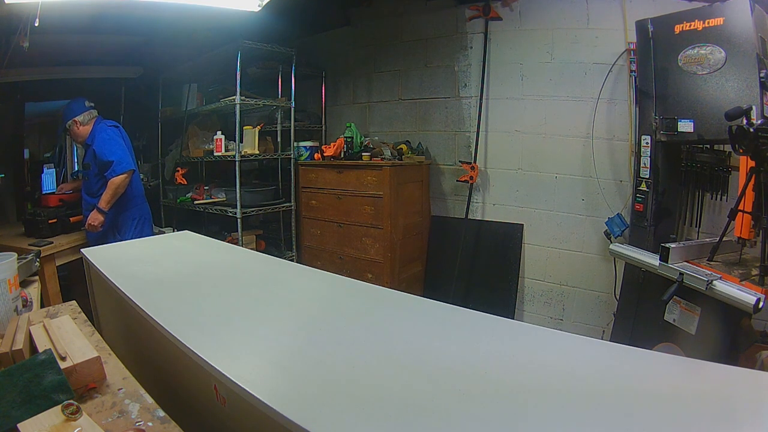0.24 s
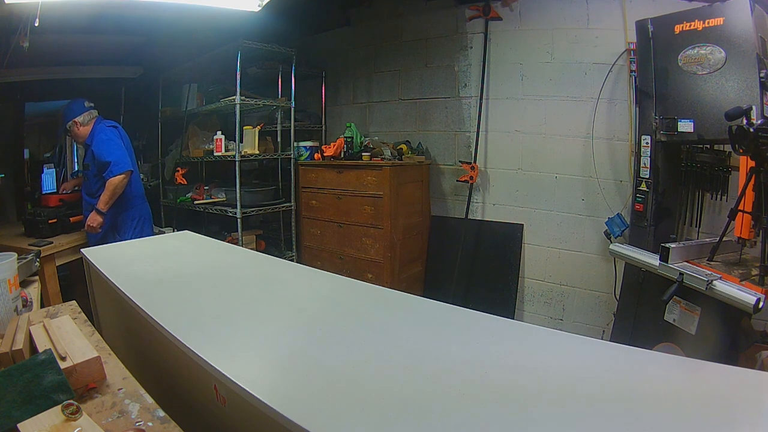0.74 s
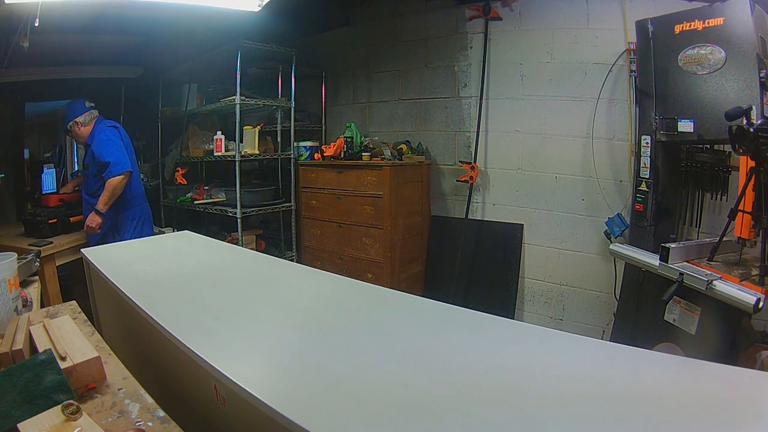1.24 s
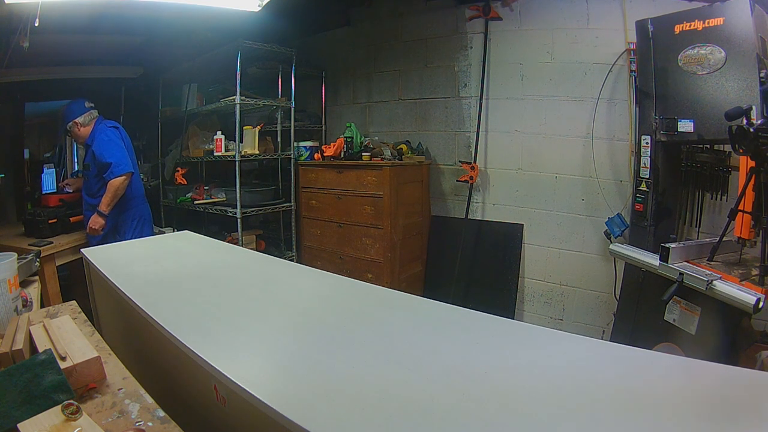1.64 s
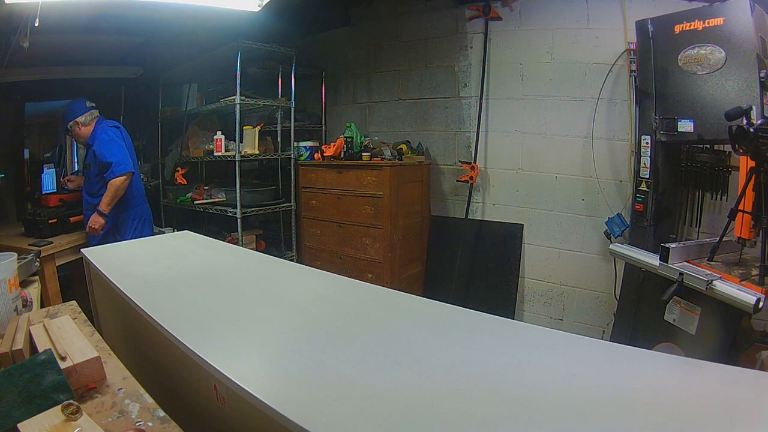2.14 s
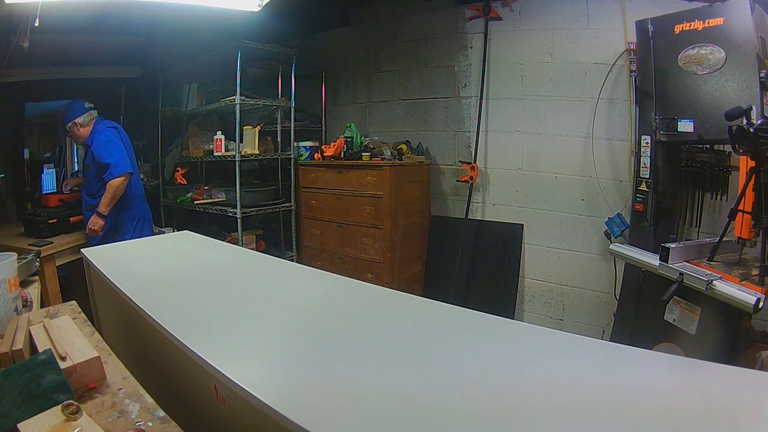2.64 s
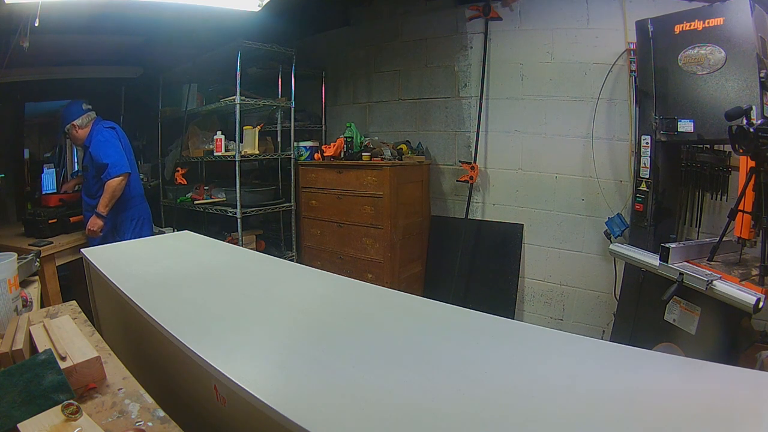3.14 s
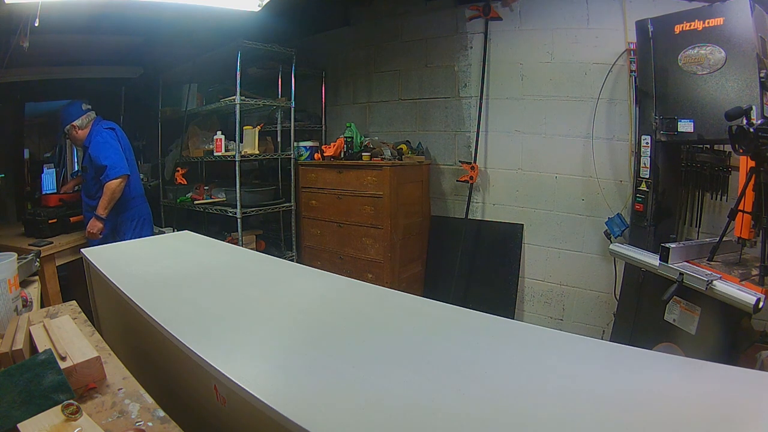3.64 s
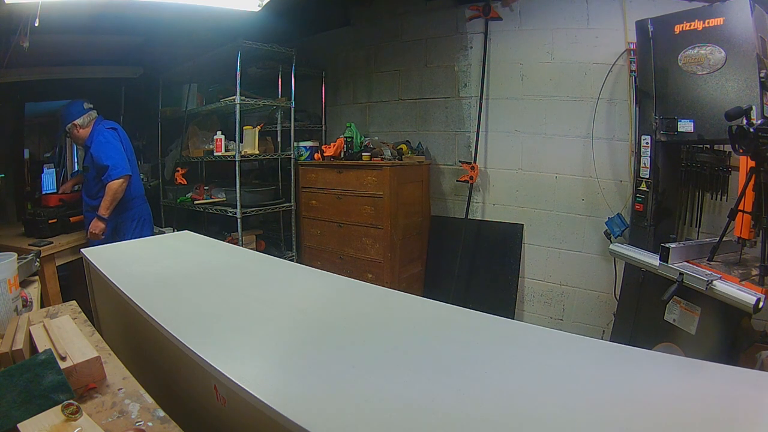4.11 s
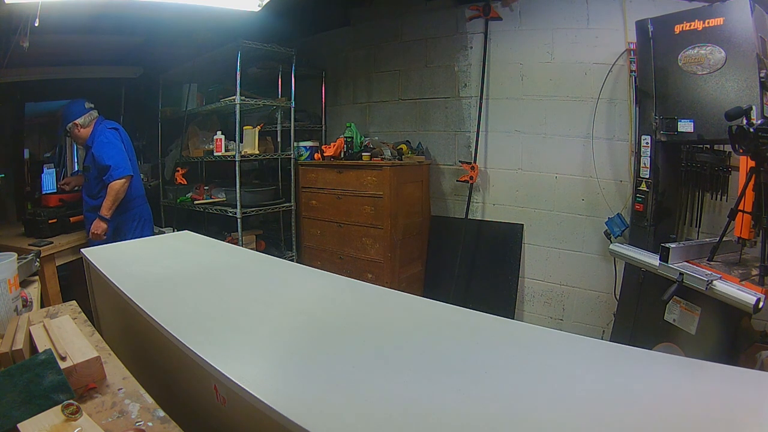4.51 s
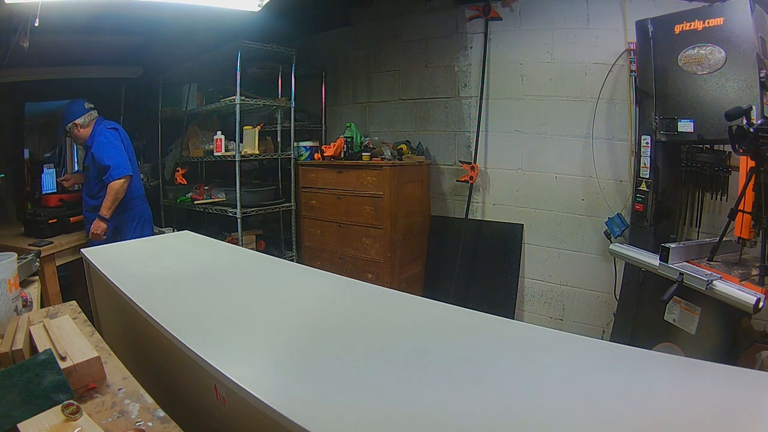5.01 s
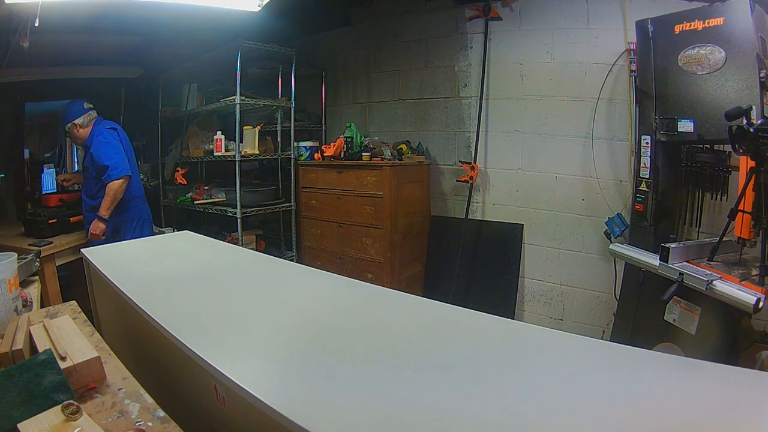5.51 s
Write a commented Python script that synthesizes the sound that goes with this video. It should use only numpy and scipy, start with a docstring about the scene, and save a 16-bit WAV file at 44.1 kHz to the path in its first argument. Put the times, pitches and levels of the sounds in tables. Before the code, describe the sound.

A quiet workshop with hard block walls, heard from several metres away; faint hiss and low building rumble run throughout. From 0 to 0.4 s, barely audible scrapes and a tiny tick. At 0.8 s a steel tool lands in a case with a loud, bright clank around 4 kHz and higher, ringing and chattering through 1.1 s, with a boxy knock and rapid weakening rebounds. Light taps and soft sliding follow from 1.2 to 1.8 s. Near stillness until a faint clink at 2.6 s, then a clear ringing spanner rattle at 2.85 to 3 s. Small pieces drag from 3.2 s, growing to rougher scraping and knocks at 3.7 and 4.07 s. At 4.35 to 4.5 s comes a sharp, high cluster of clinks and a short rattle, then a faint drag near 5 s and quiet room tone. Short diffuse echoes and soft deep bench swells follow the heavier blows.

```python
"""Rummaging in a tool case

At the far side of a block-walled workshop, steel tools and loose hardware chatter and ring, knock on the
case and slide over its floor. Random impacts drive damped modes or are coloured into cracks and scrapes.
The microphone is several metres off, so most of the sound arrives by the walls, as random decaying echoes.
Filtered noise makes the low rumble, the hiss and the bench's deep swell after each landing."""
import sys
import numpy as np
from scipy import signal
from scipy.fft import rfft, irfft
from scipy.io import wavfile

SR = 44100
rng = np.random.default_rng(int(sys.argv[2]) if len(sys.argv) > 2 else 0)


def transcribe(signal):
    """Save signal, clipped to [-1, 1], as a 16-bit WAV file at the path in sys.argv[1]."""
    frames = np.atleast_2d(signal).T
    limited = np.clip(frames, -1, 1)
    pcm = np.round(limited * 32767).astype(np.int16)
    wavfile.write(sys.argv[1], SR, pcm)


N = 254016
TAIL = 20480  # samples given to each impact and to the shop's response
AGE = np.arange(TAIL) / SR  # seconds since an impact

# Colour of the building's rumble and the bench's boom. Each row: frequency in Hz, relative dB per Hz.
RUMBLE_COLOUR = [(12, -23), (22, 3.5), (50, -6), (62, 2.5), (75, -10), (115, -13), (200, -22.5),
                 (1000, -90)]
# Colour of the crack of a contact. Each row: frequency in Hz, relative level in dB.
CRACK_COLOUR = [(100, -16.5), (250, -3.5), (480, -6.5), (700, -1), (1300, -2.5), (1900, -2.5), (3000, -3),
                (4500, -3), (6000, -6), (9000, -7.5), (11500, -15), (13000, -27), (15500, -41)]
# A tool lands in the case and settles. Each row: start in seconds, level in dB, brightness in dB per octave,
# chatter in seconds, thud of the shell in dB, level of the rebounds in dB, settling time in seconds.
LANDINGS = [ (.814, -36.5, -1.5, 0.018, -64, -44, 0.44), (0.897, -40, 13, 0.006, -60, -55, .02),
            (1.062, -36.5, .5, 0.0042, -45.5, -50.5, 0.12), (1.309, -55, -0.5, 0.0076, -87, -65, .02),
            (1.461, -49, -1, 0.006, -82, -58, 0.053), (1.571, -50.5, 2, 0.017, -64, -54, 0.055),
            (2.606, -58.5, -0.5, 0.007, -82, -63, .06), (2.845, -40, 9.5, .025, -50.5, -46.5, 0.28),
            (2.937, -39.5, 11.5, 0.0086, -61, -55, .02), (3.124, -51.5, .5, 0.02, -62.5, -62, 0.024),
            (3.728, -44.5, 3, 0.018, -57.5, -47, 0.069), (3.946, -55.5, -0.5, 0.023, -62.5, -65, .02),
            (4.068, -41.5, 4, 0.026, -54, -47, 0.13), (4.386, -39, 1.5, 0.026, -50, -38.5, 0.11), ]
# Modes of each loose piece, by name. Each row: frequency in Hz, relative level in dB, t60 in seconds.
PIECE_MODES = { "wrench": [(4330, 0, .2), (4443, -1.5, .2), (4385, -9, .07), (11083, -3, .26),
               (11312, 0, .28), (11255, -11, .1)], "spanner": [(4243, -1, .36), (4315, -3, .3),
               (4365, -3, .24), (4445, -5, .36), (8960, -22, .2), (10990, -6, .22), (11019, -5, .22),
               (11117, -1, .32), (11318, -12, .2)], "bit": [(3600, -16, .05), (4130, -11, .03),
               (8083, -10, .1), (8126, -4, .12), (8209, 0, .15), (8280, -9, .09), (9975, -17, .12),
               (11320, -29, .08), (14390, -33, .12)], "socket": [(3578, 0, .1), (3680, -7, .05),
               (4090, -5, .03), (4861, -9, .07), (8149, -4, .08), (9985, -15, .08), (14392, -16, .07)],
               "screw": [(4350, -6, .012), (4800, -8, .012), (6420, -4, .06), (8205, 0, .07),
               (11320, -1, .06), (14300, -14, .04)], "pin": [(4290, -11, .16), (6440, 0, .07)],
               "pliers": [(3364, 0.5, 0.015), (3740, 8.5, 0.01), (4310, 17.5, 0.0064), (4694, -4, 0.017),
               (5320, 2.5, 0.014), (5850, -16, 0.013)], "lid": [(678, 6.5, 0.011), (793, -4.5, 0.059),
               (1107, 9, 0.018), (1333, 9, 0.024), (1680, 5.5, 0.0062)], "washer": [(3240, -4, 0.022),
               (3360, -1, 0.0093), (4750, -2, 0.035)], "handle": [(368, -1.5, 0.013), (860, 5, 0.016),
               (1060, -13, .012)], }


def undb(db):
    """Decibels to gain."""
    return 10 ** (np.asarray(db) / 20)


def level(x, db):
    """Scale a short sound to the energy of a twentieth of a second at this level."""
    energy_s = np.sum(x ** 2) / SR
    return x * undb(db) / np.sqrt(energy_s * 20)


def colour(x, points, tilt_db=0):
    """Shape a spectrum by (Hz, dB) points and a slope in dB per octave."""
    octave = np.log2(np.maximum(np.fft.rfftfreq(len(x), 1 / SR), 10))
    hz, db = np.transpose(points)
    gain = undb(np.interp(octave, np.log2(hz), db) + tilt_db * octave)
    return irfft(rfft(x) * gain, len(x))


def add(out, s, x):
    """Mix a sound in at a time in seconds."""
    start = max(int(s * SR), 0)
    out[start:start + len(x)] += x[:N - start]


def room_paths(direct_db=-10, build_s=0.00017, sparse_s=.025):
    """Response of the shop from one spot: a weak direct path, distinct early echoes, then a dense tail."""
    # Reverberation of the shop. Each row: frequency in Hz, t60 in seconds.
    reverb_times = [(150, 0.36), (600, 0.42), (2000, 0.26), (5000, 0.25), (12000, 0.25)]
    density = np.minimum(0.11 + (AGE / sparse_s) ** 2, 1)
    present = rng.random(TAIL) < density
    echoes = rng.standard_normal(TAIL) * present / np.sqrt(density)
    spectrum = rfft(echoes)
    octave = np.log2(np.fft.rfftfreq(TAIL, 1 / SR) + 1)
    hz, t60s = np.transpose(reverb_times)
    tail = np.zeros(TAIL)
    # overlapping bands, each dying away at its own pace
    for band, t60 in zip(np.eye(len(hz)), t60s):
        band_echoes = irfft(spectrum * np.interp(octave, np.log2(hz), band))
        tail += band_echoes * np.exp(-np.log(1000) * AGE / t60)
    tail *= 1 - np.exp(-AGE / build_s)
    tail[0] += undb(direct_db) * np.sqrt(np.sum(tail ** 2))
    return np.roll(tail, SR // 2000)  # half a millisecond later


def in_room(x):
    """Impacts as they arrive across the shop; pieces move, so each finds its own pattern of echoes."""
    return signal.fftconvolve(x, room_paths())[:TAIL]


def contacts(force, rate, scatter_db):
    """Tiny impacts at random moments (rate per second), of uneven size, under a force envelope."""
    happens = rng.random(TAIL) < rate / SR
    return force * happens * undb(scatter_db * rng.standard_normal(TAIL))


def blow(chatter_s, rate=450, bounce_db=-3, clean_s=0.023):
    """A first impact and its bounces across the shop; longer chatter means a more glancing first touch."""
    bounce_force = np.exp(-(AGE / chatter_s) ** 2)
    hits = undb(bounce_db) * contacts(bounce_force, rate, scatter_db=5)
    hits[0] = 1 / (1 + (chatter_s / clean_s) ** 2)
    return in_room(hits)


def resonate(x, hz, t60):
    """One damped mode as a two-pole resonator; t60 is its 60 dB decay in seconds."""
    pole = np.exp((2j * np.pi * hz - np.log(1000) / t60) / SR)
    return signal.lfilter([1, 0, -1], [1, -2 * pole.real, abs(pole) ** 2], x)


def ring(push, modes, tilt_db=0, onset_s=0.0054):
    """Impacts drive modes, each with a slightly rounded onset; harder contact favours the high ones."""
    out = np.zeros(TAIL)
    for hz, db, t60 in modes:
        rounded = resonate(push, hz, onset_s)
        out += level(resonate(rounded, hz, t60), db + tilt_db * np.log2(hz))
    return out


def air(hiss_db=-62, rumble_db=-63.5):
    """Steady noise of the still shop: hiss over the building's low rumble, each at its RMS level."""
    # Colour of the hiss. Each row: frequency in Hz, relative dB per Hz.
    hiss_colour = [(71, -7), (120, -3.5), (230, -4.5), (339, -5.5), (415, -8.5), (690, -5.5), (2750, -14),
                   (9910, -17), (14300, -17.5), (15500, -18.5)]
    hiss = colour(rng.standard_normal(N), hiss_colour)
    rumble = colour(rng.standard_normal(N), RUMBLE_COLOUR)
    return undb(hiss_db) * hiss / np.std(hiss) + undb(rumble_db) * rumble / np.std(rumble)


def booms(hardest_boom_db=-51.5, slope=0.53, peak_s=0.085):
    """The bench answers each landing with a slow, deep swell of noise that grows with the blow."""
    out = np.zeros(N)
    swell = AGE * np.exp(-AGE / peak_s)  # tops out at peak_s
    hardest_db = max(db for _, db, *_ in LANDINGS)
    for s, db, *_ in LANDINGS:
        boom = swell * colour(rng.standard_normal(TAIL), RUMBLE_COLOUR)
        # slope: dB lost per dB of a weaker blow
        add(out, s, level(boom, hardest_boom_db + slope * (db - hardest_db)))
    return out


def slides(rate=900):
    """Pieces dragged over the case floor make a swell of small random contacts."""
    # Each row: start in seconds, length in seconds, level in dB.
    drags = [ (0, 0.03, -59.5), (.07, .16, -54), (0.323, 0.056, -59.5), (1.159, 0.15, -56),
             (1.342, 0.28, -52.5), (3.199, 0.49, -54.5), (3.654, 0.28, -47), (4.048, 0.032, -51.5),
             (4.202, 0.36, -48), (4.564, 0.18, -58), (4.886, 0.44, -64.5), ]
    out = np.zeros(N)
    for s, length_s, db in drags:
        force = np.sqrt(np.abs(np.sin(np.pi * np.minimum(AGE / length_s, 1))))
        scrape = in_room(contacts(force, rate, scatter_db=0.5))
        add(out, s, level(colour(scrape, CRACK_COLOUR), db))
    return out


def knock(db, tilt_db, chatter_s, thud_db):
    """One blow on the case: a broad crack and the thud of the shell's damped modes."""
    # Modes of the case shell and the bench under it.
    # Each row: frequency in Hz, relative level in dB, t60 in seconds.
    shell_modes = [(104, -1.5, 0.048), (185.6, 4, 0.19), (306, 3, 0.0085), (598, -0.5, 0.027),
                   (630, -15, 0.071), (910, 1, 0.0094)]
    push = blow(chatter_s)
    crack = level(colour(push, CRACK_COLOUR, tilt_db), db)
    thud = level(ring(push, shell_modes), thud_db)
    return crack + thud


def knocks(count=4, rebound_s=.047, rebound_chatter_s=0.029, rebound_thud_db=-15, settled_db=-9):
    """A tool lands in the case, then rebounds at even intervals, ever more weakly."""
    out = np.zeros(N)
    for s, db, tilt_db, chatter_s, thud_db, rebound_db, settle_s in LANDINGS:
        add(out, s, knock(db, tilt_db, chatter_s, thud_db))
        for after_s in rebound_s * (1 + np.arange(count)):
            # changed by settled_db at the end of the settling time
            now_db = rebound_db + settled_db * (after_s / settle_s) ** 2
            rebound = knock(now_db, 0, rebound_chatter_s, now_db + rebound_thud_db)
            add(out, s + after_s, rebound)
    return out


def rattles(touch_gap_s=.022, fall_db=-7.5):
    """A piece rocks against its neighbours at even intervals; every touch rings its modes again."""
    # Each row: start in seconds, piece, level in dB, brightness in dB per octave, length in seconds,
    # loudest moment as a fraction of the length, chatter of a touch in seconds.
    rocking = [ (0.812, "wrench", -29, -2.5, 0.071, 0.86, 0.01),
               (.965, "wrench", -38.5, 2.5, .044, 0, 0.012), (1.46, "socket", -62.5, 4, 0.093, 0.2, 0.018),
               (2.849, "spanner", -32.5, 1.5, .122, 0.28, 0.011),
               (3.748, "screw", -43.5, -0.5, 0.034, 0.7, 0.0096),
               (4.386, "bit", -29, 5.5, .041, 0.26, 0.0052),
               (4.416, "socket", -36.5, 1.5, .054, 0.38, 0.0062), ]
    out = np.zeros(N)
    for s, piece, db, tilt_db, length_s, loudest, chatter_s in rocking:
        touches = 1 + round(length_s / touch_gap_s)  # the gap is approximate
        for part in np.linspace(0, 1, touches):
            touch = ring(blow(chatter_s), PIECE_MODES[piece], tilt_db)
            # changed by fall_db one whole length away from the loudest moment
            touch_db = db + fall_db * (part - loudest) ** 2
            add(out, s + part * length_s, level(touch, touch_db))
    return out


def clinks():
    """Loose pieces ring when struck; close pairs of steel modes beat."""
    # Each row: start in seconds, piece, level in dB, brightness in dB per octave, chatter in seconds.
    strikes = [ (.11, "screw", -59.5, -8, 0.012), (0.812, "lid", -36.5, 1, 0.0051),
               (.913, "wrench", -27.5, 24, 0.007), (1.010, "socket", -45, 1, 0.0036),
               (1.061, "pliers", -35.5, 23, 0.0066), (1.516, "spanner", -50.5, -3, 0.01),
               (1.523, "bit", -60, 1, 0.013), (1.573, "pliers", -59, 0, 0.0066),
               (2.659, "spanner", -59.5, 8, 0.0061), (2.845, "lid", -46, -5.5, 0.029),
               (3.265, "pin", -56, -2, 0.00075), (3.738, "pliers", -46.5, -14, 0.051),
               (4.064, "pliers", -43, -26, 0.039), (4.071, "bit", -49.5, 1, 0.024),
               (4.295, "handle", -51.5, -1.5, 0.0014), (4.347, "socket", -50, 3.5, 0.0067),
               (4.355, "bit", -35.5, 20, 0.045), (4.386, "pliers", -37, -23, .0015),
               (4.484, "washer", -42.5, -2, 0.0022), ]
    out = np.zeros(N)
    for s, piece, db, tilt_db, chatter_s in strikes:
        struck = ring(blow(chatter_s), PIECE_MODES[piece], tilt_db)
        add(out, s, level(struck, db))
    return out


def scene():
    """All sources at one microphone."""
    background = air() + booms()
    case = slides() + knocks()
    pieces = rattles() + clinks()
    return (background + case + pieces)[None]


def record(dry, top_hz=15400):
    """A steep elliptic low-pass cuts the top of the treble."""
    low_pass = signal.ellip(10, .2, 80, top_hz, fs=SR, output="sos")
    return signal.sosfilt(low_pass, dry)


dry = scene()
out = record(dry)
transcribe(out)
```